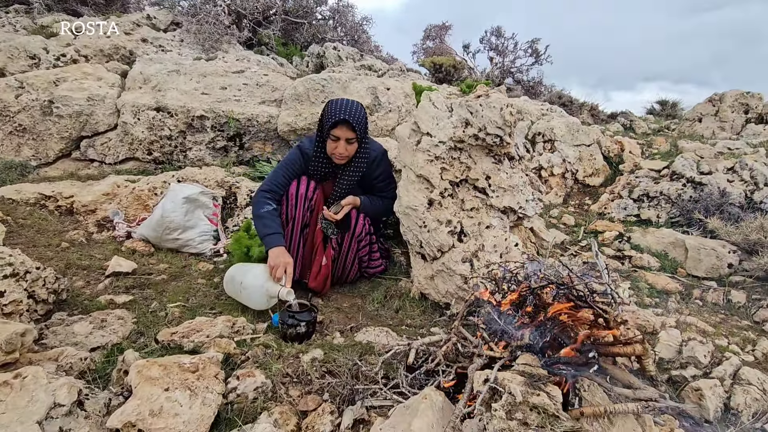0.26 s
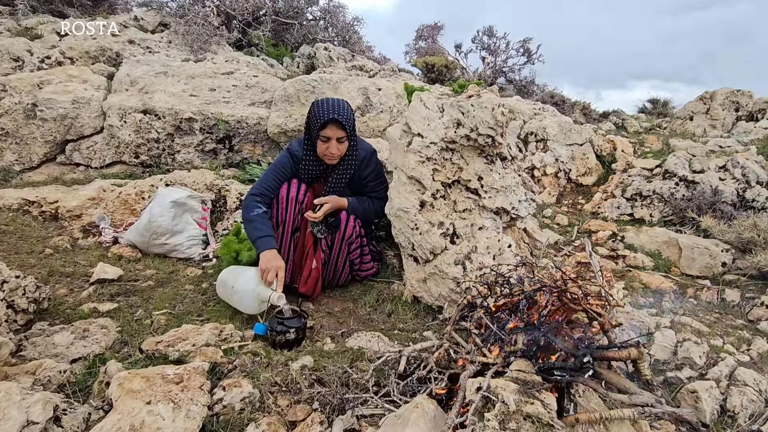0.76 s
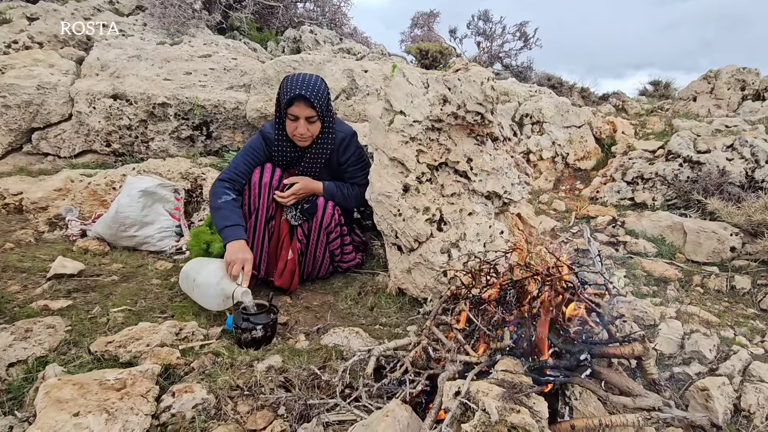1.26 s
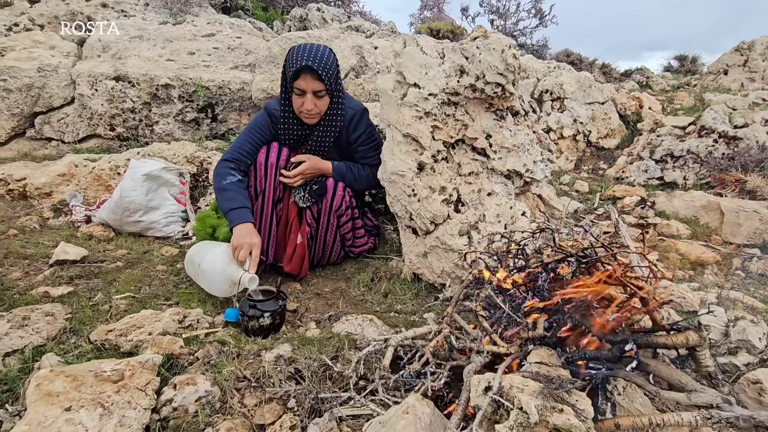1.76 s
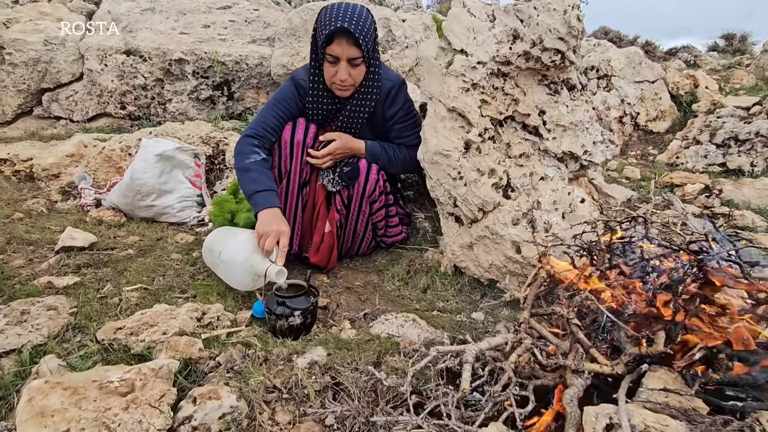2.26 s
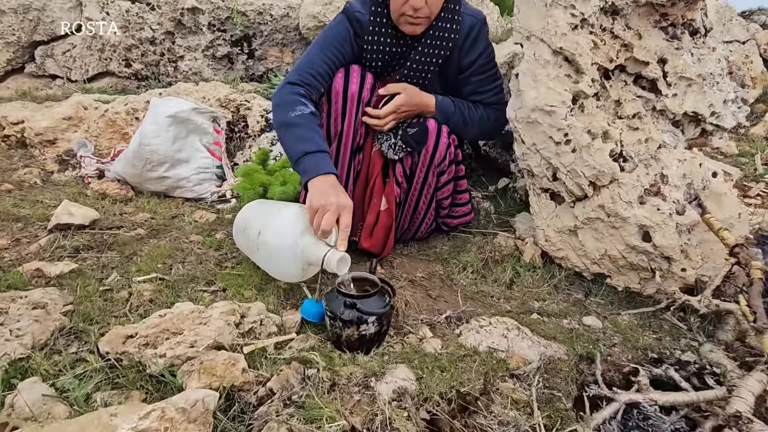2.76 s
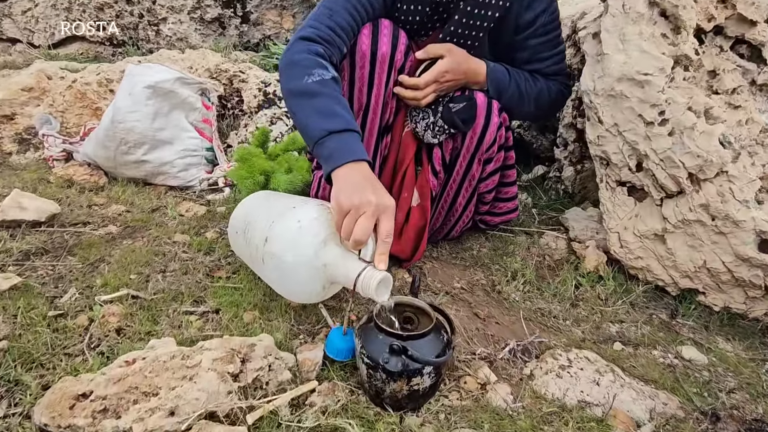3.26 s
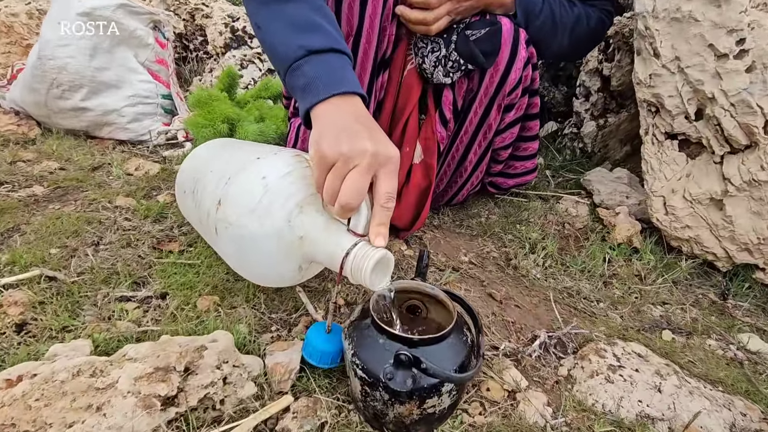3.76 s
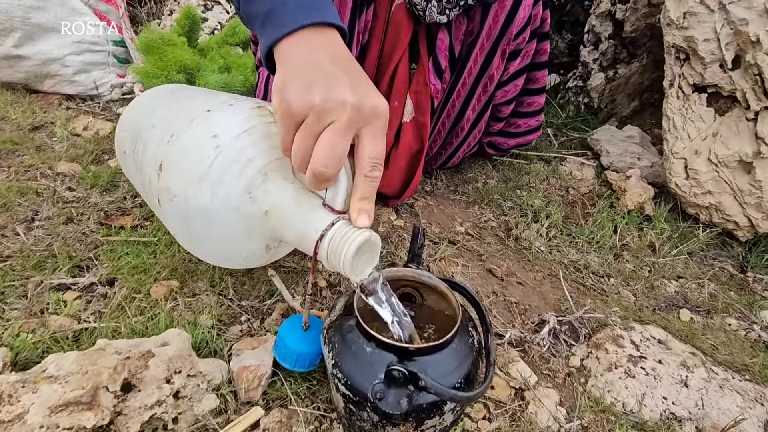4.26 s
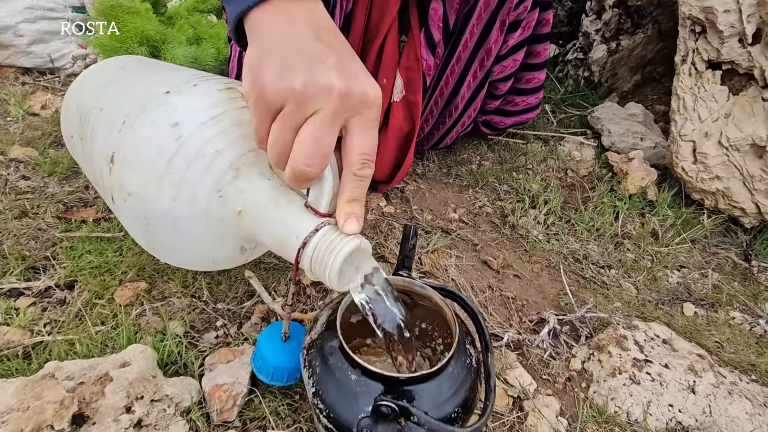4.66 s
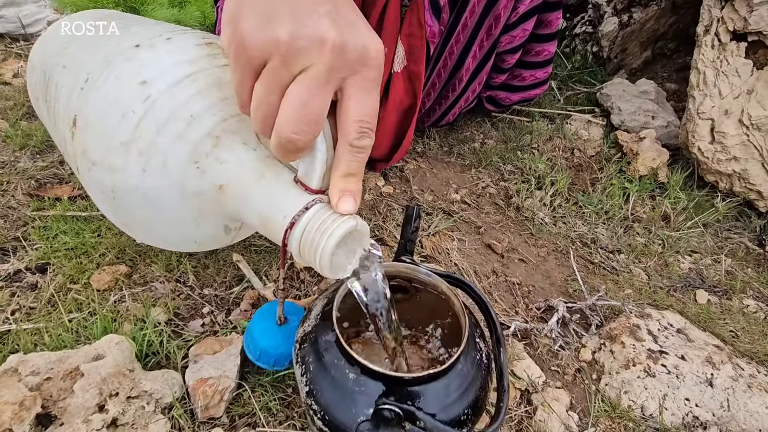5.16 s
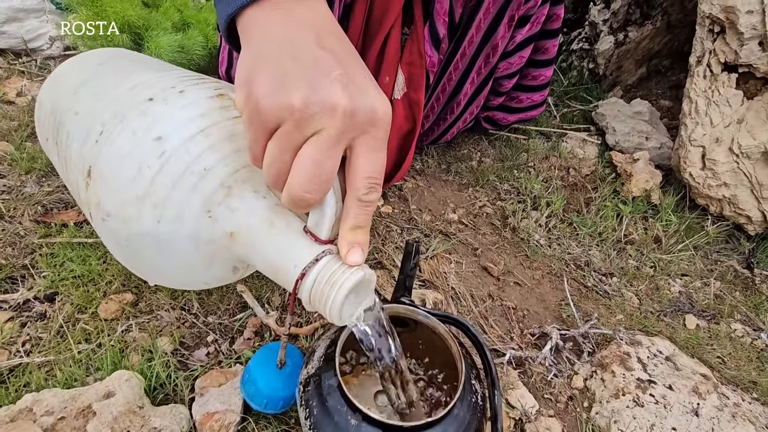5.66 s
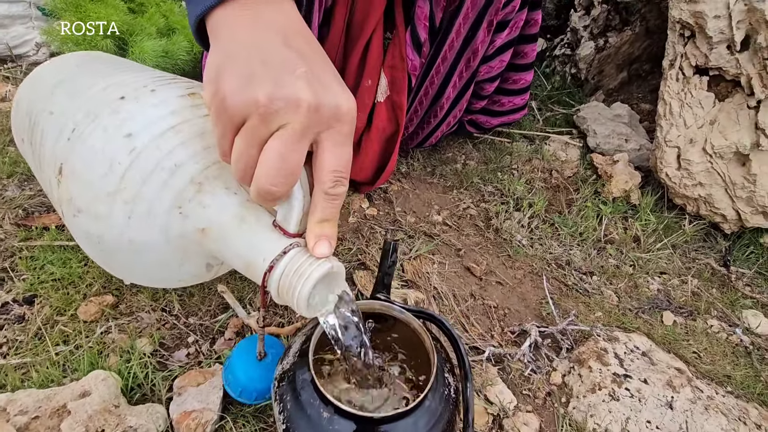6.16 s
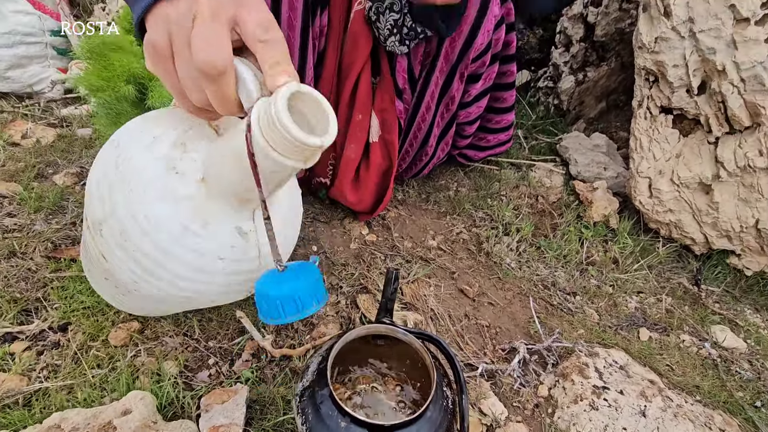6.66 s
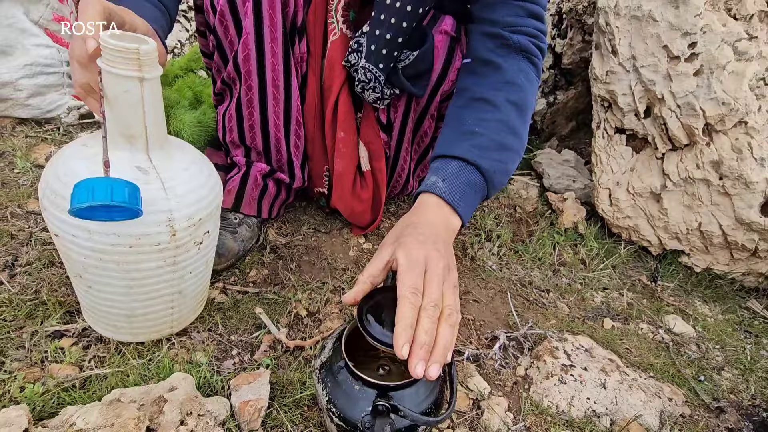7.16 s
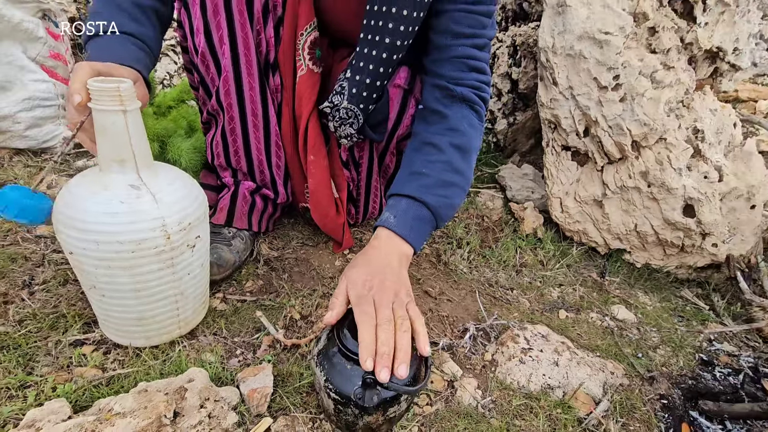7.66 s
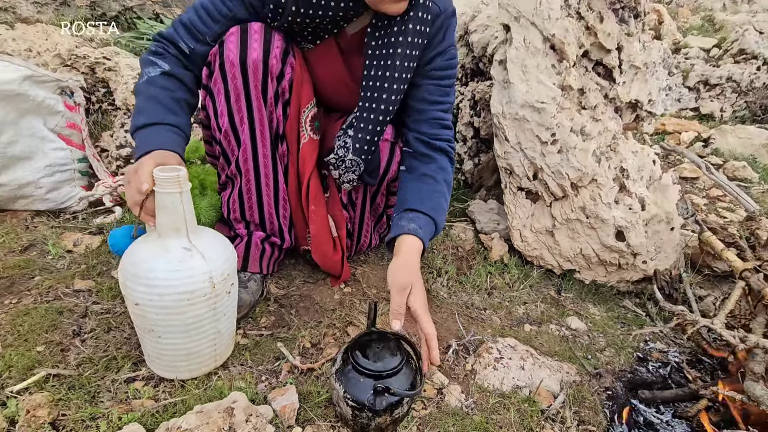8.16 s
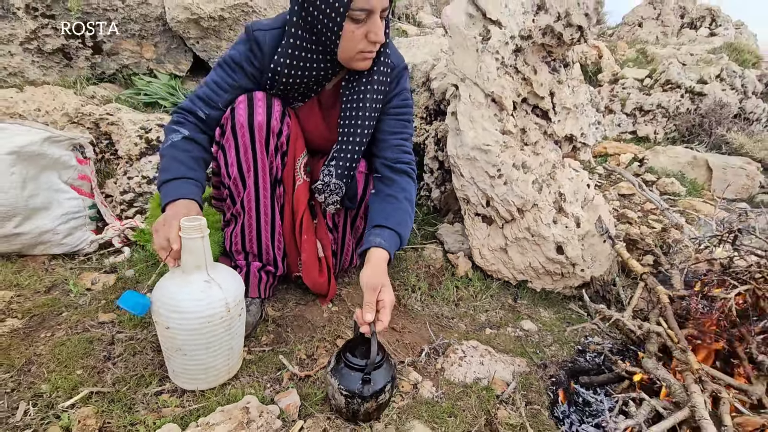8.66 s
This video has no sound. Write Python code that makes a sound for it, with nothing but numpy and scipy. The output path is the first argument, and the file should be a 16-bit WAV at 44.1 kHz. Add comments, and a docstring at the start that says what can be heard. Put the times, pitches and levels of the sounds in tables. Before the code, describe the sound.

Water glugs from a plastic jug into a small metal kettle, pitch rising, beside a rumbling, crackling brush fire; then jug and lid knock down.

```python
"""Kettle filled beside a brush fire

Water glugs from a plastic jug into a small metal kettle: damped sines, the air note rising as it fills.
The jug is set down, its cap rattles and the lid goes on: struck modes under noise bursts.
A brush fire on the right roars as coloured noise, with noise bursts for snaps and crackle; fire and water hiss.
A little wind buffets the two microphone ports: low noise, partly separate at each."""
import sys
import numpy as np
from scipy import signal
from scipy.fft import rfft, irfft, next_fast_len
from scipy.io import wavfile
from scipy.ndimage import uniform_filter1d, map_coordinates

SR = 44100
rng = np.random.default_rng(int(sys.argv[2]) if len(sys.argv) > 2 else 0)


def transcribe(u):
    """Save the signal u as a 16-bit wav file named by the first command-line argument.

    u: samples, shape (n,) or (channels, n), limited to [-1, 1]; the rate is SR.
    q: integer samples, one column per channel.
    """
    v = np.clip(np.atleast_2d(u).T, -1, 1)
    q = np.round(v * 32767).astype(np.int16)
    wavfile.write(sys.argv[1], SR, q)


N = 392490


def amp(db):
    """Decibels to gain."""
    return 10 ** (np.asarray(db) / 20)


def unit(x):
    """Scaled to rms 1."""
    return x / np.sqrt(np.mean(x ** 2) + 1e-20)


def along(points, hz):
    """(Hz, value) points read on a log frequency axis."""
    f, v = np.transpose(points)
    return np.interp(np.log(hz + 1), np.log(f + 1), v)


def curves(rows, s=None):
    """Each column after the time, read at the times s or at every sample."""
    at, *cols = np.transpose(rows)
    if s is None:
        s = np.arange(N) / SR
    return [np.interp(s, at, c) for c in cols]


def wobble(rate_hz):
    """A smooth random curve, rate_hz knots a second."""
    knots = rng.standard_normal(int(N * rate_hz / SR) + 4)
    return map_coordinates(knots, [np.arange(N) * rate_hz / SR])


def filtered(x, response):
    """x times a response of frequency."""
    m = next_fast_len(N + SR // 2)
    return irfft(rfft(x, m) * response(np.fft.rfftfreq(m, 1 / SR)), m)[..., :N]


def rush(spectrum, patchy_db, channels):
    """Coloured noise of rms 1; patches of random gain in time and frequency are shared by the channels."""
    z = signal.stft(rng.standard_normal((channels, N)), nperseg=512)[2]
    field = uniform_filter1d(rng.standard_normal(z.shape[1:]), size=6, axis=0)
    field = uniform_filter1d(field, size=8, axis=1)
    noise = signal.istft(z * amp(patchy_db * unit(field)), nperseg=512)[1][:, :N]
    return unit(filtered(noise, lambda hz: amp(along(spectrum, hz))))


def rings(s, hz, db, t60, pan_db, late_ms, size, attack=0.000067, rise=0, rough_hz=0, hold=0):
    """Damped sines of wandering pitch, held for hold s; the left port hears them late_ms after the right."""
    columns = np.broadcast_arrays(s, hz, db, t60, pan_db, late_ms, hold)
    s, hz, db, t60, pan_db, late_ms, hold = (v.ravel()[:, None] for v in columns)
    first = np.floor(s * SR).astype(int) - 32  # room for the earlier port
    at = np.maximum(first, 0) + np.arange(size)
    wander_hz = rough_hz * unit(uniform_filter1d(rng.standard_normal((len(s), size)), size=200))
    drift_cycles = np.cumsum(wander_hz, axis=1) / SR
    fade = np.cos(np.pi / 2 * np.arange(size) / size)
    out = []
    for side in (1, -1):  # left, right
        t = np.maximum((first + np.arange(size)) / SR - s - side * late_ms / 2000, 0)
        wave = np.sin(2 * np.pi * (hz * t * (1 + rise * t / t60) + drift_cycles))
        wave *= 1 - np.exp(-t / attack)
        wave *= amp(db + side * pan_db / 2 - 60 * np.maximum(t - hold, 0) / t60) * fade
        out.append(np.bincount(at.ravel(), wave.ravel(), N + size)[:N])
    return np.array(out)


def puffs(s, db, pan_db, late_ms, t60, hz, width, size, echo_db=-14, attack=1e-5, order=1):
    """Noise bursts in a band around hz: a front shared by both ports, then a scattered tail of their own."""
    s, db, pan_db, late_ms = (v[:, None] for v in np.broadcast_arrays(s, db, pan_db, late_ms))
    t = np.arange(size) / SR
    noise = rng.standard_normal((len(s), 3, size))
    out = []
    for side, own in ((0.92, 1), (-1.1, 2)):  # left, right
        front = noise[:, 0] * amp(-60 * t / t60)
        tail = noise[:, own] * amp(echo_db - 12 * t / t60) * (1 - t / t[-1])
        wave = amp(db + side * pan_db / 2) * (front + tail) * (1 - np.exp(-t / attack))
        first = np.round((s + side * late_ms / 2000) * SR).astype(int)
        at = np.maximum(first, 0) + np.arange(size)
        out.append(np.bincount(at.ravel(), wave.ravel(), N + size)[:N])

    def band(f):
        return (1j * f * hz * width / (hz * hz - f * f + 1j * f * hz * width)) ** order
    return filtered(np.array(out), band)


# Spectrum of both buffeting and roar. Each row: frequency in Hz, relative density in dB per Hz.
RUMBLE_SPECTRUM = [(8.8, -34), (15, -3.5), (37, -6), (59, 2), (200, -19), (260, -53), (440, -120)]
# Gusts. Each row: centre in seconds, level in dB.
GUSTS = [(.255, -28), (.335, -32), (.7, -32), (1.97, -36), (2.5, -31)]
GUST_HALF_S, BREEZE_DB = 0.049, -48
OWN_SHARE = 0.71  # gain of each port's own noise against the common one


def wind():
    """Short gusts over a steady breeze; the turbulence differs in part from port to port."""
    t = np.arange(N) / SR
    strength = amp(BREEZE_DB) + sum(amp(db) * np.exp(-((t - s) / GUST_HALF_S) ** 2) for s, db in GUSTS)
    common, *own = rush(RUMBLE_SPECTRUM, patchy_db=4.0, channels=3)
    buffeting = amp(5.0 * wobble(15)) * (common + OWN_SHARE * np.array(own))
    return strength * unit(buffeting)


# Flames. Each row: time in seconds, roar level in dB, flutter level in dB.
FLAME_LEVELS = [(0, -37, -48), (.8, -44.5, -52.5), (1.4, -47, -54.5), (2.3, -41, -54), (3, -42.5, -44.5),
                (5.5, -36.5, -43.5), (7.2, -40, -43.5), (8.9, -40, -49)]
# Flutter spectrum. Each row: frequency in Hz, relative density in dB per Hz.
FLUTTER_SPECTRUM = [(71, -16.5), (120, -9.5), (271, -16), (384, -26.5), (604, -32), (952, -39), (1500, -68),
                    (3300, -120)]
# Drifting bearing of the fire. Each row: time in seconds, delay at the left port in ms.
FIRE_BEARING = [(0, 0.32), (2, 0.31), (6.5, 0.52), (7.5, 0.42)]


def flames():
    """Low roar and higher flutter of the flames, one noise that reaches the left port late."""
    roar_db, flutter_db = curves(FLAME_LEVELS)
    roar = amp(roar_db + 0.32 * wobble(2.78)) * rush(RUMBLE_SPECTRUM, patchy_db=1.0, channels=1)[0]
    flutter = amp(flutter_db + 0.12 * wobble(4.7)) * rush(FLUTTER_SPECTRUM, patchy_db=1.5, channels=1)[0]
    right = roar + flutter
    delay_samples = curves(FIRE_BEARING)[0] * SR / 1000
    left = np.interp(np.arange(N) - delay_samples, np.arange(N), right)
    return np.array([left, right])


# Hiss, which also sets the crackle. Each row: time in seconds, level in dB.
HISS_LEVEL = [(.2, -68.5), (.45, -60), (1.6, -58.5), (1.75, -63.5), (2.3, -60), (2.45, -70.5), (2.75, -57),
              (3.35, -54.5), (3.7, -56.5), (7.9, -57.5), (8.05, -62), (8.9, -60.5)]
# Hiss spectrum. Each row: frequency in Hz, relative density in dB per Hz.
HISS_SPECTRUM = [(590, 2), (1000, 3), (1640, 0.5), (2700, -7.5), (4400, -3.5), (14900, -5), (16600, -8)]


def hiss_and_crackle():
    """Broad treble hiss of fire and splashing water, separate noise at each port; crackles in bunches of three."""
    hiss_db = curves(HISS_LEVEL)[0] + 1.4 * wobble(13) + wobble(40)
    hiss = amp(hiss_db) * rush(HISS_SPECTRUM, patchy_db=2.2, channels=2)
    draw = rng.random((900, 3))
    s = np.repeat(rng.random(300) * N / SR, 3) + .06 * draw[:, 0]
    db = curves(HISS_LEVEL, s)[0] + 4 - 3.3 * np.log(draw[:, 1])  # many faint, few loud
    pan_db, late_ms = 12 * draw[:, 2] - 8, .45 - 0.75 * draw[:, 2]
    return hiss + puffs(s, db, pan_db, late_ms, t60=0.014, hz=7500, width=1.6, size=900, attack=.0004)


# Twig snaps. Each row: start in seconds, level in dB.
TWIG_SNAPS = [(0.088, -42), (0.719, -42.5), (0.7983, -37), (1.1086, -42), (1.994, -43.5), (3.047, -41),
              (3.134, -41.5), (4.6094, -42.5), (5.359, -41), (5.609, -39.5), (6.516, -41), (8.239, -48.5),
              (8.294, -46.5)]
SNAP_DULL_DB, SNAP_PAN_DB = -8, -15.5  # dull part against the bright one; left against right


def snaps():
    """Twigs break in the fire on the right: a bright burst over a duller one."""
    s, db = np.transpose(TWIG_SNAPS)
    late_ms, = curves(FIRE_BEARING, s)
    bright = puffs(s, db, SNAP_PAN_DB, late_ms, t60=0.034, hz=10500, width=0.98, size=1500)
    dull = puffs(s, db + SNAP_DULL_DB, SNAP_PAN_DB, late_ms, t60=0.031, hz=3460, width=0.35, size=1500)
    return bright + dull


# Kettle position, a little left: left against right in dB, delay at the left port in ms.
KETTLE_PLACE = (2.2, -.12)
# Stray drops. Each row: start in seconds, level in dB, band centre in Hz.
STRAY_DROPS = [(0.364, -38, 7100), (0.487, -27.5, 4500), (0.624, -24, 4160), (1.09, -29, 4770),
               (1.292, -33, 4400), (1.372, -23.5, 2200), (2.299, -30, 4530), (2.326, -22.5, 860),
               (2.809, -29, 3070), (3.2568, -30.5, 1660), (3.312, -25.5, 2220), (3.721, -31.5, 7230),
               (3.856, -31, 3330), (4.8587, -28, 4700), (4.8861, -23, 5200), (5.129, -27.5, 2630),
               (6.484, -25.5, 2600), (6.632, -25.5, 4100), (8.202, -30.5, 3160)]


def stray_drops():
    """Stray drops smack metal and stone by the kettle, each a burst in its own band."""
    return sum(puffs([s], db, *KETTLE_PLACE, t60=0.055, hz=hz, width=0.45, size=1500, attack=.001, order=2)
               for s, db, hz in STRAY_DROPS)


def knocks(blows, modes, body_hz, body_db, pan_db, late_ms):
    """Blows ring the modes at varied strengths under clack, thump and crack; dull ones spare the top modes."""
    s, db, crack_db = np.transpose(blows)
    hz, mode_db, t60 = np.transpose(modes)
    level = np.c_[db] + mode_db + body_db * (hz < body_hz)
    level += np.outer(np.minimum(crack_db, 0), hz > 3700)
    level += 2 * rng.standard_normal((len(s), len(hz)))
    rough_hz = np.c_[np.tile(.022 * hz, len(s))]
    ring = rings(np.c_[s], hz, level, t60, pan_db, late_ms, size=7000, attack=.0001, rough_hz=rough_hz)
    clack = puffs(s, db + 10.5, pan_db, late_ms, t60=0.016, hz=2200, width=0.8, size=3500,
                  echo_db=-3, attack=.0005, order=2)
    thump = puffs(s, db + 11.5, pan_db, late_ms, t60=0.051, hz=550, width=0.67, size=2000)
    crack = puffs(s, db + crack_db + 3, pan_db, late_ms, t60=0.006, hz=7000, width=2.0, size=2000)
    return ring + clack + thump + crack


# Jug and cap knocks. Each row: start in seconds, level in dB, crack in dB against it.
JUG_KNOCKS = [(6.878, -22, 0.5), (6.991, -34, -38), (7.02, -26, 5.5), (7.13, -29, 3.5), (7.187, -38, -26),
              (7.197, -37, 5), (7.25, -42, -14)]
# Plastic modes. Each row: frequency in Hz, relative level in dB, T60 in seconds.
PLASTIC_MODES = [(1185, 4, .11), (1850, -3, .09), (2140, -2, .05), (2930, -11, .05)]
LANDED_S, CAP_BODY_DB = 6.9, -15


def jug():
    """The jug's landing, to the left, rings its body; later cap rattles ring the modes below 2500 Hz less."""
    body_db = CAP_BODY_DB * (np.array(JUG_KNOCKS)[:, [0]] > LANDED_S)
    return knocks(JUG_KNOCKS, PLASTIC_MODES, 2500, body_db, pan_db=4.5, late_ms=-.35)


# Lid on the rim. Each row: start in seconds, level in dB, crack in dB against it.
LID_KNOCKS = [(7.279, -26, -1), (7.347, -43.5, -27), (7.382, -42, -21), (7.502, -32.5, 11.5),
              (7.636, -20, -15), (7.642, -26, 13), (7.709, -47, -20), (7.822, -38.5, -21),
              (7.872, -33.5, -31), (7.903, -44, -24), (7.928, -44.5, -27)]
# Metal modes. Each row: frequency in Hz, relative level in dB, T60 in seconds.
METAL_MODES = [(794, -0.5, 0.14), (840, -6, 0.098), (1557, -13.5, 0.098), (1880, -17.5, 0.15),
               (2205, -1.5, 0.037), (2450, -18.5, 0.19), (2960, -15, 0.23), (3520, -20, 0.18),
               (4200, 0.5, 0.1), (4720, 2, 0.051)]
PALM_S, PALM_DB = 7.45, -16


def lid():
    """The lid is pressed onto the full kettle; with a palm on it, later blows ring modes below 1000 Hz less."""
    body_db = PALM_DB * (np.array(LID_KNOCKS)[:, [0]] > PALM_S)
    return knocks(LID_KNOCKS, METAL_MODES, 1000, body_db, pan_db=2, late_ms=-.135)


WALL_START_HZ, WALL_RISE_PER_S = 1594, 0.0215


def wall_hz(s):
    """The kettle wall's ring, rising steadily with time."""
    return WALL_START_HZ * (1 + WALL_RISE_PER_S * s)


# Air left in the kettle. Each row: time in seconds, resonance in Hz.
AIR_PITCH = [(0, 493), (3.5, 558), (4.3, 691), (4.8, 778), (6.8, 1060)]
# Big bubbles. Each row: start in seconds, level in dB, pitch in Hz.
BIG_BUBBLES = [(0.511, -45, 696), (0.633, -48, 557), (0.994, -51, 554), (1.076, -33, 494),
               (1.254, -48, 477), (1.494, -47, 501), (1.606, -46.5, 525), (1.679, -46.5, 533),
               (1.921, -32, 511), (2.138, -35, 540), (2.23, -48.5, 535), (2.354, -40, 599),
               (2.469, -45.5, 475), (2.556, -46.5, 579), (2.7, -42.5, 560), (3.002, -45.5, 535),
               (3.08, -46, 550), (3.119, -44.5, 522), (3.364, -44, 1130), (3.708, -49.5, 587),
               (3.978, -31, 632), (4.113, -34.5, 693), (4.305, -44, 676), (4.397, -26.5, 763),
               (4.547, -24, 500), (4.62, -45, 720), (4.788, -42.5, 795), (5.006, -29, 844),
               (5.128, -42, 717), (5.465, -28, 1036), (5.498, -39, 938), (5.602, -42, 947),
               (5.67, -46.5, 1156), (5.824, -31.5, 944), (5.854, -37, 1095), (6.059, -25.5, 1258),
               (6.148, -34.5, 1046), (6.169, -43, 1310), (6.197, -35.5, 966), (6.284, -43, 1110),
               (6.313, -44, 806), (6.433, -32, 1244), (6.466, -35.5, 1284), (6.545, -40.5, 974),
               (6.572, -43, 1500), (6.635, -44, 763)]
WALL_DB, WALL_SPREAD_DB = -20, 4  # overtone and wall ring against the glug, and their scatter
HUM_S_PER_DB = 0.006  # gentle low glugs hold their note


def glugs():
    """Big bubbles ring, with the kettle's air, an overtone and the wall, as the surface smacks shut."""
    s, db, hz = np.transpose(BIG_BUBBLES)
    hold_s = HUM_S_PER_DB * np.maximum(-39 - db, 0) * (hz < 600)
    bubble = rings(s, hz, db, 0.085, *KETTLE_PLACE, size=5000, attack=0.0007,
                   rise=-.04, rough_hz=20, hold=hold_s)
    air_hz, air_db = curves(AIR_PITCH, s)[0], db - 6.5 - 1.8 * s
    air = rings(s + 0.0058, air_hz, air_db, 0.13, *KETTLE_PLACE, size=5000, attack=0.00085, rough_hz=39.5)
    smack = puffs(s, db - 0.5, *KETTLE_PLACE, t60=0.021, hz=4470, width=0.51, size=1200)
    upper_hz = np.c_[2 * hz, wall_hz(s)]
    upper_db = np.c_[db] + WALL_DB + WALL_SPREAD_DB * rng.standard_normal((len(s), 2))
    upper = rings(np.c_[s], upper_hz, upper_db, 0.051, *KETTLE_PLACE, size=3000, attack=0.0011)
    return bubble + air + smack + upper


# Gurgle; the last row ends the pour. Each row: time in seconds, base level in dB.
GURGLE_LEVEL = [(0, -75), (.6, -66.5), (3.3, -65), (4.7, -60.5), (5.35, -72.5), (6.7, -65)]


def gurgle(s, big, choice):
    """Small bubbles ring near the air's pitch, and either about an octave up or at the wall's ring."""
    db, = curves(GURGLE_LEVEL, s)
    scatter = .04 + .022 * s  # pitches scatter more as time goes on
    air_hz = curves(AIR_PITCH, s)[0] * np.exp(scatter * rng.standard_normal((2, len(s))))
    low = rings(s, air_hz[0], db + 7 * big[:, 0], 0.14, *KETTLE_PLACE, size=2600, attack=0.002, rough_hz=30.6)
    upper_hz = np.where(choice < .5, 2 * air_hz[1], wall_hz(s))
    upper_db = db - 8 + 6 * big[:, 1]
    upper = rings(s, upper_hz, upper_db, 0.13, *KETTLE_PLACE, size=2600, attack=0.006, rough_hz=30)
    return low + upper


# Splash pitch falls until 4.7 s, then rises a little.
# Each row: time in seconds, base splash level in dB, usual pitch in Hz.
SPLASHES = [(0, -65.5, 4640), (.5, -54, 4540), (2.4, -66.5, 3500), (3.2, -60, 2010), (4.7, -69, 1633),
            (6.7, -67.5, 2130)]


def fizz(s, big, choice):
    """Each drop bursts on the surface into a spray of six short blips."""
    splash_db, splash_hz = curves(SPLASHES, s)
    drop_hz = np.c_[splash_hz] * 3 ** (np.c_[choice] - .4)
    hz = drop_hz * np.exp(.12 * rng.standard_normal((len(s), 6)))
    at = np.c_[s] + .02 * rng.random(hz.shape) ** 2
    db = np.c_[splash_db + 5.5 * big[:, 1]]
    return rings(at, hz, db, 40 / hz + .008, *KETTLE_PLACE, size=900, attack=.0012, rough_hz=100)


def water():
    """Big glugs, plus small bubbles and drops that strike together at random through the pour."""
    draw = rng.random((480, 4))
    s = draw[:, 0] * GURGLE_LEVEL[-1][0]
    big = np.minimum(-np.log(draw[:, [1, 3]]), 3)  # many small, a few large
    choice = draw[:, 2]
    return glugs() + gurgle(s, big, choice) + fizz(s, big, choice)


def scene():
    """Water and knocks over fire and wind, in the open air."""
    fire = flames() + hiss_and_crackle() + snaps()
    return wind() + fire + stray_drops() + jug() + lid() + water()


def record(dry):
    """Top treble is 20 dB down above 15800 Hz and absent from 16800 Hz."""
    return filtered(dry, lambda hz: amp(-20 * (hz > 15800)) * (hz < 16800))


dry = scene()
out = record(dry)
transcribe(out)
```